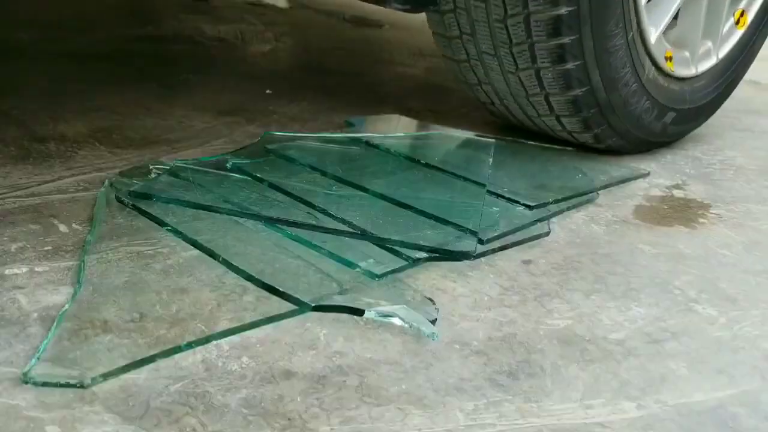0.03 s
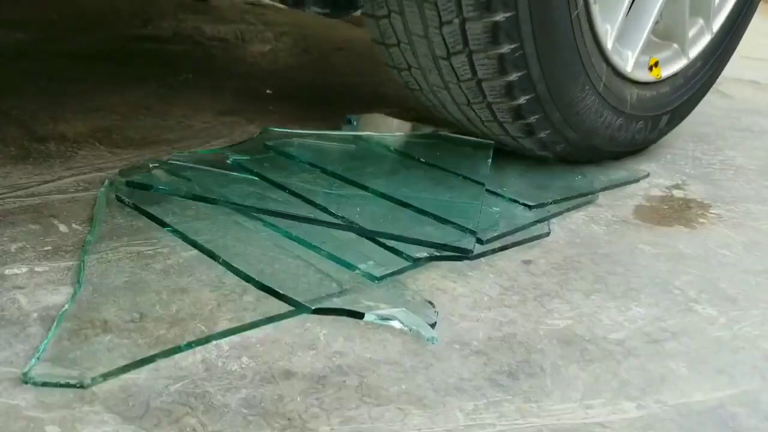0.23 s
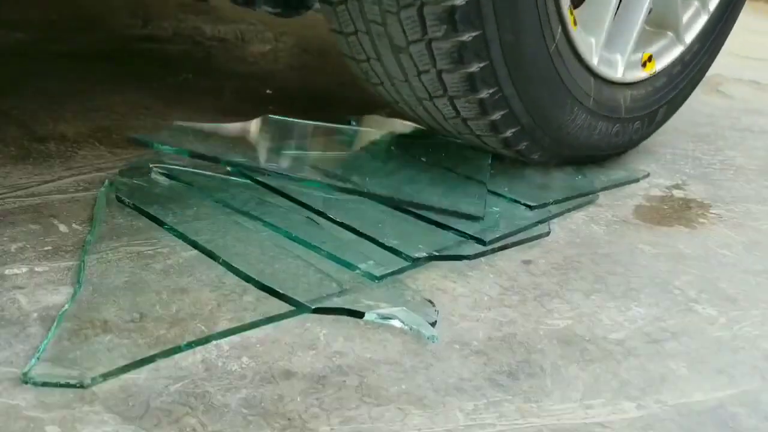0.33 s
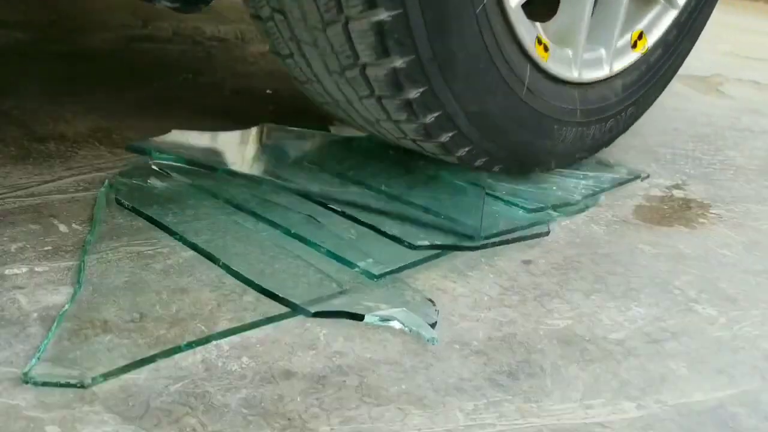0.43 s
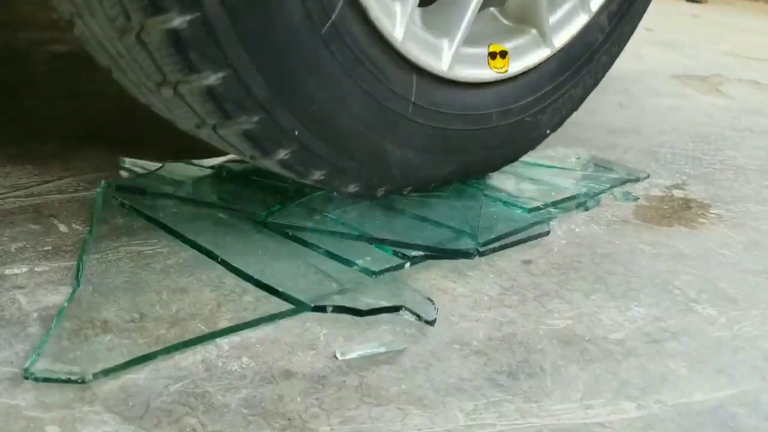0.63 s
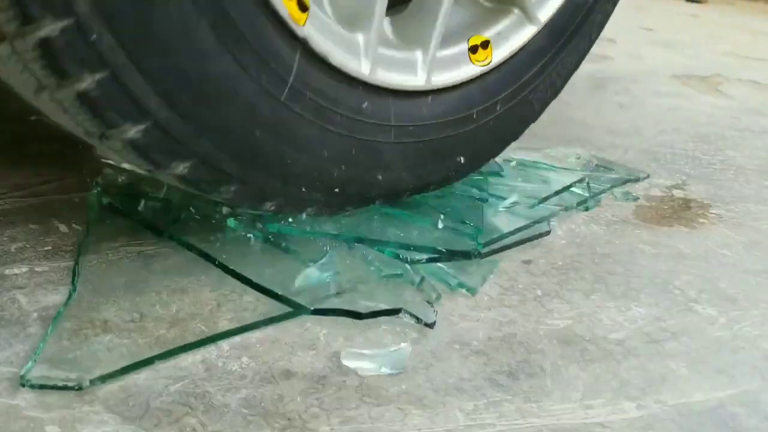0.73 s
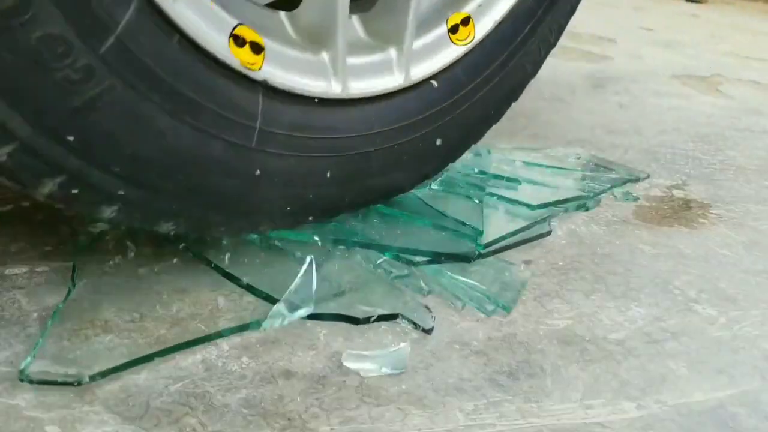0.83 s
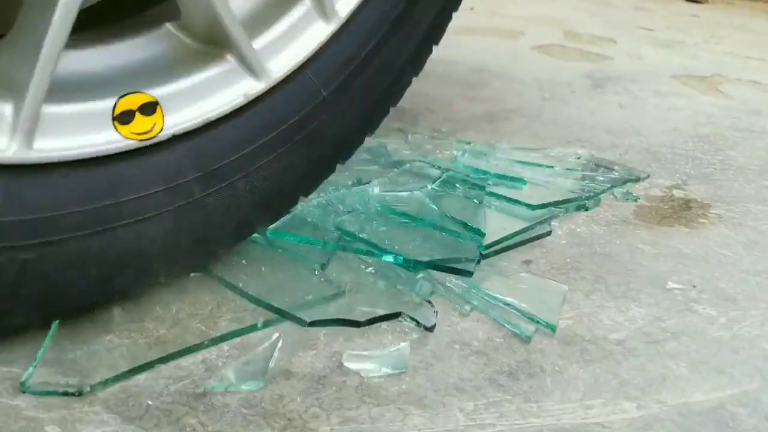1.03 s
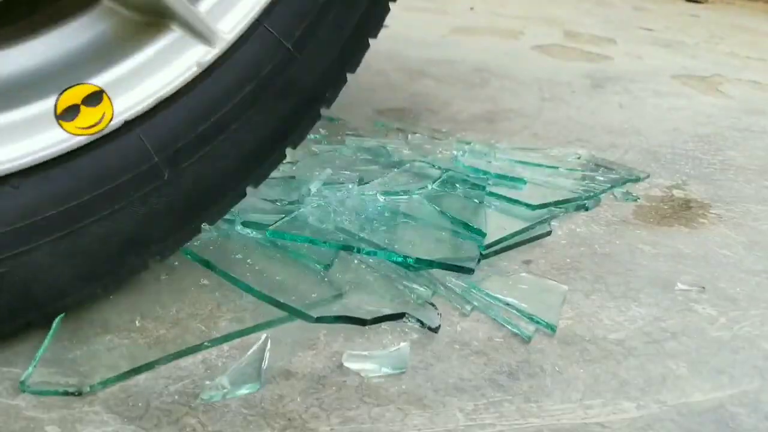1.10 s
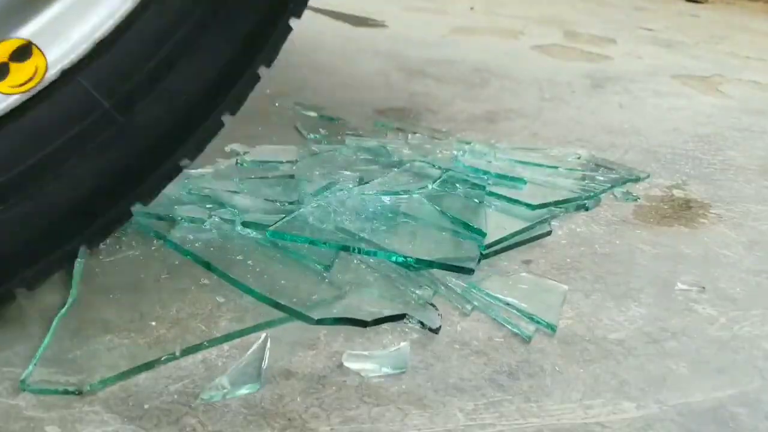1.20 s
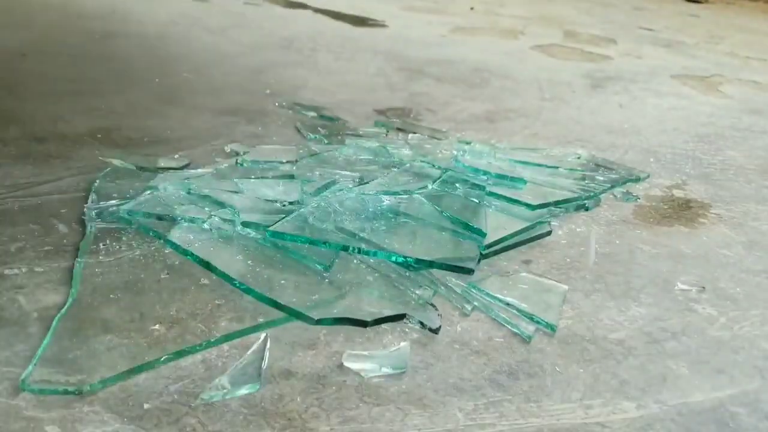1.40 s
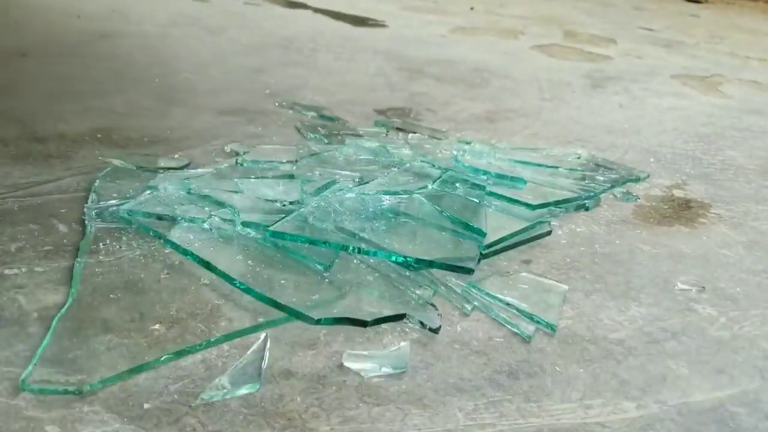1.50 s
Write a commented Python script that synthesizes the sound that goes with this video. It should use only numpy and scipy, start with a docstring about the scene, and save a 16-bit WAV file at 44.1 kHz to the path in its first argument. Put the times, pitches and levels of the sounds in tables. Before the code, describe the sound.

Panes of glass snap and splinter in quick bursts under a rumbling car tyre, heard close by. Loose shards tinkle and glass slaps the concrete floor, then the crunching dies away while the car hums faintly.

```python
"""A car tyre rolls onto a stack of glass panes on concrete, with a low rumble and a faint hum.
Splinters crunch under the tread while the panes snap in bursts of tiny fractures and loose shards ring.
Midway a pane slaps the floor; two more slaps follow as the tyre rolls off, the last the hardest.
Then the debris settles and the car hums on, fading."""
import sys
import numpy as np
from scipy import signal
from scipy.fft import rfft, irfft, next_fast_len
from scipy.io import wavfile

SR = 44100
rng = np.random.default_rng(int(sys.argv[2]) if len(sys.argv) > 2 else 0)


def output_pcm(signal):
    """Save a mono or channel-first signal as 16-bit PCM at the path in sys.argv[1].

    Samples are clipped to [-1, 1] before scaling.
    """
    pcm = np.clip(np.atleast_2d(signal).T, -1, 1) * 32767
    wavfile.write(sys.argv[1], SR, np.round(pcm).astype(np.int16))


N = 68355
T = np.arange(N) / SR
RING_N, SNAP_N = SR // 7, SR // 16


def from_db(db):
    """Decibels to gain."""
    return 10 ** (np.asarray(db) / 20)


def rms(x):
    """Root mean square."""
    return np.sqrt(np.mean(x ** 2) + 1e-20)


def envelopes(rows):
    """One gain curve per dB column; the first column is time in seconds."""
    times, *columns = np.transpose(rows)
    return [from_db(np.interp(T, times, db)) for db in columns]


def add(out, start_s, x):
    """Mix x into out from start_s."""
    i = max(int(start_s * SR), 0)
    out[..., i:i + x.shape[-1]] += x[..., :N - i]


def colour(x, points):
    """Minimum-phase filter through points of (Hz, dB)."""
    size = next_fast_len(x.shape[-1] // 2 + 1024, True) * 2
    hz, db = np.transpose(points)
    grid_hz = np.maximum(np.fft.rfftfreq(size, 1 / SR), 1)
    gain = from_db(np.interp(np.log(grid_hz), np.log(hz), db))
    cepstrum = irfft(np.log(gain))
    cepstrum[1:size // 2] *= 2
    cepstrum[size // 2 + 1:] = 0
    return irfft(rfft(x, size) * np.exp(rfft(cepstrum)))[..., :x.shape[-1]]


def band(x, low_hz, high_hz):
    """Butterworth band-pass."""
    return signal.sosfilt(signal.butter(4, [low_hz, high_hz], "band", fs=SR, output="sos"), x)


def clicks(per_s, spread_db, size):
    """Random clicks, many small and a few large."""
    heights = from_db(spread_db * np.minimum(rng.exponential(1, size), 4)) * rng.choice([-1, 1], size)
    return heights * (rng.random(size) < per_s / SR)


# Background noise spectrum. Each row: frequency in Hz, relative level in dB.
AIR_SPECTRUM = [(30, 3.5), (300, -13), (1000, -16), (12000, -21.5)]

def air(level_db=-91):
    """Very faint steady noise, strongest in the bass."""
    noise = colour(rng.standard_normal((2, N)), AIR_SPECTRUM)
    return from_db(level_db) * noise / rms(noise)


def room(x, t60_s=0.24, onset_s=0.0072, level_db=-14):
    """Diffuse reflections from floor, car body and walls."""
    tail = rng.standard_normal((2, N)) * from_db(-60 * T / t60_s) * (1 - np.exp(-T / onset_s))
    tail /= rms(tail) * np.sqrt(N)
    return from_db(level_db) * signal.fftconvolve(x, tail, axes=1)[:, :N]


# Swell of the hum. Each row: time in seconds, level in dB.
HUM_LEVELS = [(0.17, -115), (0.301, -57), (1.0, -47), (1.15, -50), (1.35, -54), (1.55, -61.5)]

def car_hum(hz=192):
    """The car hums on one low tone."""
    return envelopes(HUM_LEVELS)[0] * np.sqrt(2) * np.sin(2 * np.pi * hz * T)


# Rumble and tread spectra. Each row: frequency in Hz, relative level in dB.
RUMBLE_SPECTRUM = [(20, -10), (60, -1.5), (130, 1), (220, -12), (500, -53)]
TREAD_SPECTRUM = [(90, -20.5), (190, -1), (290, -1), (430, -1.5), (700, -13), (1500, -29.5), (5000, -53.5)]
# Course of the roll. Each row: time in seconds, relative rumble and tread levels in dB.
ROLL_LEVELS = [(0.16, -90, -97), (0.2, -60, -53.5), (0.29, -47, -37.5), (0.42, -42, -33),
               (0.51, -38, -28.5), (0.57, -44.5, -39.5), (0.68, -40.5, -39.5), (0.736, -46.5, -39),
               (0.78, -37.5, -27.5), (0.86, -47.5, -46), (0.93, -53, -48.5), (1.0, -44, -51),
               (1.08, -56.5, -50.5), (1.22, -69, -60.5), (1.32, -75.5, -56), (1.42, -77, -67.5),
               (1.52, -76.5, -69)]

def tyre(gain_db=-2):
    """Lumpy contacts of the rolling tyre: a deep rumble and the dull rustle of the tread."""
    out = np.zeros((2, N))
    for envelope, spectrum in zip(envelopes(ROLL_LEVELS), (RUMBLE_SPECTRUM, TREAD_SPECTRUM)):
        contacts = np.array([clicks(per_s=2000, spread_db=3.5, size=N) for _ in range(2)])
        lumps = colour(contacts, spectrum)
        out += envelope * lumps / rms(lumps)
    return from_db(gain_db) * out


# Loose shards. Each row: start in seconds, pitch in Hz, relative level in dB, T60 in seconds.
SHARD_RINGS = [(0.221, 10680, -22.5, .06), (0.390, 9160, -12, 0.065), (0.402, 10560, -9, .06),
               (0.695, 9150, -18, 0.1), (0.720, 9120, -7, 0.055), (0.790, 9700, -10, 0.044),
               (0.971, 2865, -12.5, 0.044), (0.971, 9170, -14.5, 0.031), (1.083, 8570, -31, .12),
               (1.09, 8570, -24.5, 0.15), (1.091, 10440, -35, 0.082), (1.166, 5230, -35.5, 0.06),
               (1.255, 3400, -45, 0.077), (1.283, 3200, -53, 0.066), (1.283, 8400, -54.5, .06)]

def shards(pair_ratio=1.012, upper_db=-5, attack_s=0.001):
    """Freed shards ring, each with a close pair of beating modes."""
    out, t = np.zeros((2, N)), T[:RING_N]
    for start_s, hz, db, t60_s in SHARD_RINGS:
        phase = rng.uniform(0, 2 * np.pi, (2, 2, 1))
        lower = np.sin(2 * np.pi * hz * t + phase[0])
        upper = from_db(upper_db) * np.sin(2 * np.pi * hz * pair_ratio * t + phase[1])
        envelope = from_db(db - 60 * t / t60_s) * (1 - np.exp(-t / attack_s))
        add(out, start_s, (lower + upper) * envelope)
    return out * from_db([[-2], [-5]])   # mid, side


# Modes of a pane on the floor. Each row: frequency in Hz, relative level in dB, T60 in seconds.
SLAP_MODES = [(200, -24.5, 0.071), (278, -18, .06), (385, -15.5, 0.054), (524, -27.5, 0.025),
              (590, -14, .04), (665, -18.5, 0.078), (800, -17.5, 0.071), (1050, -24.5, 0.021),
              (1466, -23, 0.016)]
# Floor hits. Each row: start in seconds, level in dB, pulse length in seconds.
SLAP_HITS = [(0.5036, -11.5, 0.0024), (0.8894, -15.5, 0.001), (0.9699, -2.5, 0.0015)]

def slaps():
    """A pane hits the concrete: one push and pull of air, then its low modes."""
    out, t = np.zeros((2, N)), T[:RING_N]
    for start_s, hit_db, pulse_s in SLAP_HITS:
        pulse = np.sin(2 * np.pi * t / pulse_s) * (t < pulse_s) * [[1], [0]]   # mid only
        body = np.zeros((2, RING_N))
        for hz, db, t60_s in SLAP_MODES:
            phase = rng.uniform(0, 2 * np.pi, (2, 1))
            body += from_db(db - 60 * t / t60_s) * np.sin(2 * np.pi * hz * t + phase)
        attack = np.minimum(t / pulse_s, 1)
        add(out, start_s, from_db(hit_db) * (pulse + body * attack))
    return out


def glass_piece(t60_s, ring_db, size, modes, tick_s=0.0005):
    """Mid and side response of a piece of glass: a sharp tick and inharmonic modes."""
    t = T[:size]
    hz = rng.uniform(np.sqrt(550), np.sqrt(12300), (modes, 1)) ** 2
    mode_t60_s = t60_s * np.exp(0.5 * rng.standard_normal((modes, 1)))
    weights = rng.standard_normal((2, modes)) * (hz ** 0.25 / np.sqrt(mode_t60_s)).T
    ring = weights @ (np.sin(2 * np.pi * hz * t) * from_db(-60 * t / mode_t60_s))
    tick = rng.standard_normal((2, size)) * np.exp(-t / tick_s)
    return tick / rms(tick) + from_db(ring_db) * ring / rms(ring)


# Modes of the whole stack. Each row: frequency in Hz, bandwidth in Hz, relative level in dB.
STACK_RESONANCES = [(655, 24, 1.5), (817, 52, 0.5), (923, 50, -6.5)]

def stack_ring(x, gain_db=-6.5):
    """The stacked panes resonate under the tread, driven by x."""
    return sum(from_db(gain_db + db) * signal.lfilter(*signal.iirpeak(hz, hz / width_hz, fs=SR), x)
               for hz, width_hz, db in STACK_RESONANCES)


# Spectrum of breaking glass, for crunch and cracks. Each row: frequency in Hz, gain in dB.
GLASS_SPECTRUM = [(59, -42), (100, -15.5), (247, -13), (290, -2.5), (355, -19), (470, -7.5), (732, -4),
                  (842, -0.5), (1010, -5), (3170, 0), (6810, -12.5), (9020, -6.5), (12200, -9.5),
                  (15900, -39), (22000, -120)]
# Course of the grinding. Each row: time in seconds, relative midrange and treble levels in dB.
CRUNCH_LEVELS = [(0.18, -95, -98), (0.185, -40.5, -53), (0.2, -32.5, -44), (0.222, -23, -26.5),
                 (0.248, -13.5, -28), (0.285, -13, -15.3), (0.336, -5, -13.5), (0.385, -17, -17),
                 (0.44, -15.5, -12.5), (0.474, -23.2, -26.5), (0.52, -12.5, -14.5), (0.6, -14, -16),
                 (0.655, -20, -21.5), (0.691, -8, -15.5), (0.744, -25, -22), (0.788, -9.5, -11.5),
                 (0.825, -21.5, -23.5), (0.88, -26, -27), (0.951, -28.8, -30.5), (1.0, -30, -33.5),
                 (1.08, -41, -40.5), (1.2, -48.5, -51.5), (1.28, -59.5, -63.5), (1.33, -70.5, -74.5),
                 (1.55, -71, -71.5)]

def crunch(splinters_per_s=3200, pieces=10, gain_db=-4.5):
    """Splinters break and rub at random, each ringing one of several pieces."""
    grains = np.zeros((2, N))
    for _ in range(pieces):
        breaks = clicks(splinters_per_s / pieces, spread_db=3.5, size=N)
        piece = glass_piece(t60_s=0.07, ring_db=2, size=RING_N, modes=64)
        grains += signal.fftconvolve(breaks[None], piece, axes=1)[:, :N]
    grains = colour(grains, GLASS_SPECTRUM)
    grains += stack_ring(grains)
    parts = band(grains, 500, 5000), band(grains, 5000, 12600)
    out = sum(envelope * part / rms(part) for envelope, part in zip(envelopes(CRUNCH_LEVELS), parts))
    return from_db(gain_db) * out


# Snapping panes. Each row: start in seconds, relative bass, knock, crunch and treble levels in dB,
# decay time of the fracture run in seconds.
PANE_SNAPS = [(0.25, -38, -15.5, -15.5, -26, 0.0036), (0.266, -53, -20, -19, -19.5, 0.0056),
              (0.281, -42, -18.5, -14.5, -15, 0.0082), (0.292, -44, -24.5, -10.5, -26.5, 0.0064),
              (0.309, -42, -18, -11.5, -25.5, 0.01), (0.324, -32.5, -25, -17, -19.5, 0.0044),
              (0.333, -42, -19.5, -13.5, -19.5, 0.01), (0.347, -34, -21, -17, -20.5, 0.0032),
              (0.368, -44.5, -25.5, -14, -17.5, 0.004), (0.378, -44, -33, -16.5, -21, 0.0048),
              (0.39, -43, -25.5, -14.5, -14, 0.0095), (0.4115, -30.5, -15, -11, -14, 0.006),
              (0.431, -38.5, -26.5, -16, -19, 0.0067), (0.453, -31.5, -15, -13, -19.5, 0.01),
              (0.46, -31.5, -18, -18.5, -25.5, 0.0063), (0.48, -37.5, -30.5, -10.5, -12.5, 0.0063),
              (0.492, -41.5, -22, -12.5, -23.5, 0.0083), (0.5025, -20, -16, -11, -15, 0.007),
              (0.594, -42.5, -30.5, -10, -23.5, 0.0096), (0.627, -42, -25.5, -11, -24, 0.0031),
              (0.64, -40, -19.5, -18, -24.5, 0.0077), (0.663, -26.5, -14, -9, -12.5, 0.006),
              (0.681, -39.5, -28.5, -12, -15.5, 0.0033), (0.696, -29.5, -23.5, -18, -22.5, 0.0082),
              (0.751, -28.5, -16.5, -11.5, -12.5, 0.0079), (0.767, -35.5, -22.5, -16, -17, 0.0044),
              (0.7826, -27, -24.5, -11, -15.5, 0.0044), (0.791, -28.5, -35.5, -13.5, -17.5, 0.0099),
              (0.838, -32.5, -18.5, -17.5, -16, 0.011), (0.8895, -38, -24, -28, -33.5, 0.0024),
              (0.938, -46.5, -38.5, -28, -29, 0.007), (0.9624, -38.5, -27.5, -28, -19, 0.0023),
              (0.9708, -19, -21.5, -18.5, -16.5, 0.0039), (1.032, -46.5, -49.5, -27.5, -30.5, 0.0027),
              (1.055, -43.5, -52, -38, -37.5, 0.0035), (1.112, -48, -52, -39, -53, 0.0043),
              (1.162, -53, -55, -39.5, -45.5, 0.0058)]

def cracks(fractures_per_s=4500, edges_hz=(100, 500, 1300, 5000, 12600),
           band_gains_db=(-2.5, -2.5, -1.5, -0.5)):
    """Each snap is a first break and a dying run of fractures through one pane."""
    out, snaps = np.zeros((2, N)), []
    onset_n = SR // 125   # the first 8 ms set a snap's level
    for *_, decay_s in PANE_SNAPS:
        run = clicks(fractures_per_s, spread_db=0.5, size=SNAP_N) * np.exp(-T[:SNAP_N] / decay_s)
        run[0] = 2.5   # first break
        pane = glass_piece(t60_s=0.021, ring_db=-3, size=SNAP_N, modes=56)
        snaps.append(signal.fftconvolve(run[None], pane, axes=1)[:, :SNAP_N])
    snaps = colour(np.array(snaps), GLASS_SPECTRUM)
    for k, gain_db in enumerate(band_gains_db):
        parts = band(snaps, edges_hz[k], edges_hz[k + 1])
        for (start_s, *levels_db, _), part in zip(PANE_SNAPS, parts):
            unit_snap = np.array([channel / rms(channel[:onset_n]) for channel in part])
            add(out, start_s, unit_snap * from_db(levels_db[k] + gain_db))
    return out


# Stereo width. Each row: frequency in Hz, side gain in dB.
SIDE_GAINS = [(40, -5.5), (120, -14.5), (300, -7.5), (750, -6.5), (1300, -3), (2200, 0.5), (12000, 0)]
# Stereo balance. Each row: frequency in Hz, left minus right in dB.
LEFT_BIAS = [(40, 3), (150, 2.7), (1000, 2.5), (2000, 1.1), (4000, 2), (12000, 5)]

def scene():
    """Mid and side mixed to stereo: narrow in the bass, wide in the treble, a little to the left."""
    glass = cracks() + crunch() + slaps()
    mid, side = air() + glass + room(glass) + shards() + tyre()
    mid += car_hum()
    side = colour(side, SIDE_GAINS)
    left = colour(mid + side, [(hz, db / 2) for hz, db in LEFT_BIAS])
    right = colour(mid - side, [(hz, -db / 2) for hz, db in LEFT_BIAS])
    return np.array([left, right])


def record(dry):
    """Soft clipping of the loudest peaks, then a steep low-pass."""
    ceiling, cutoff_hz = 0.77, 12450
    rounded = dry / (1 + (dry / ceiling) ** 4) ** 0.25
    return signal.sosfilt(signal.ellip(10, 0.2, 70, cutoff_hz, fs=SR, output="sos"), rounded)


dry = scene()
out = record(dry)
output_pcm(out)
```